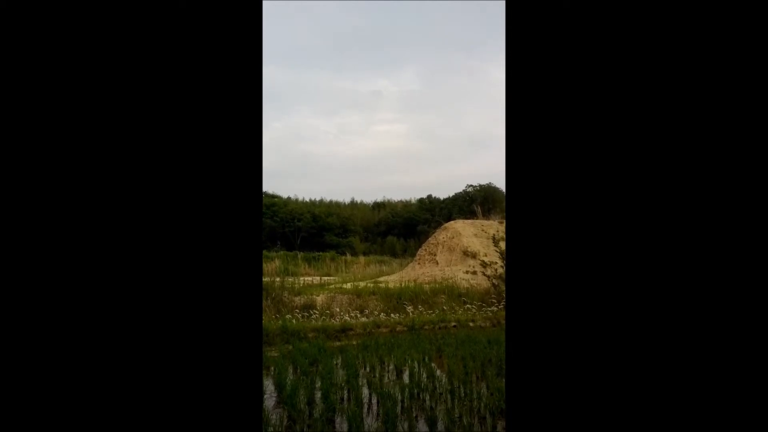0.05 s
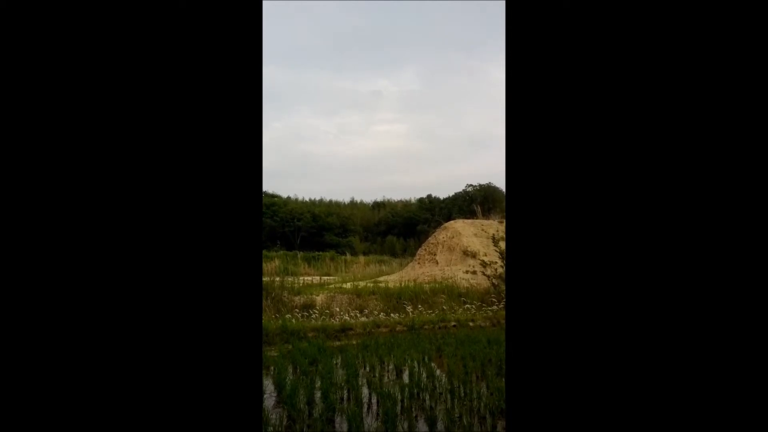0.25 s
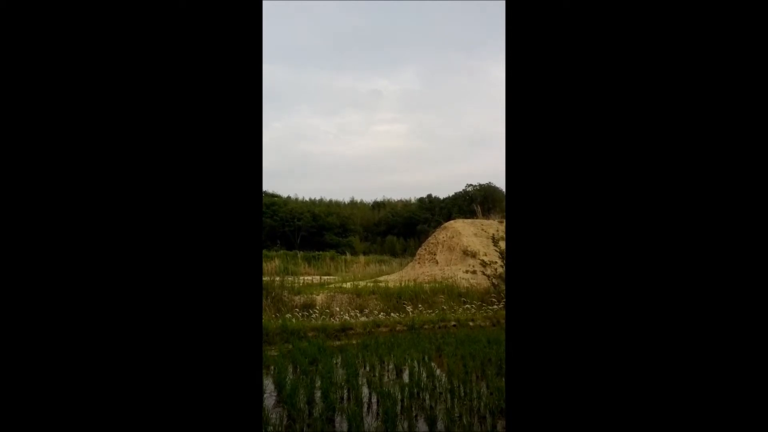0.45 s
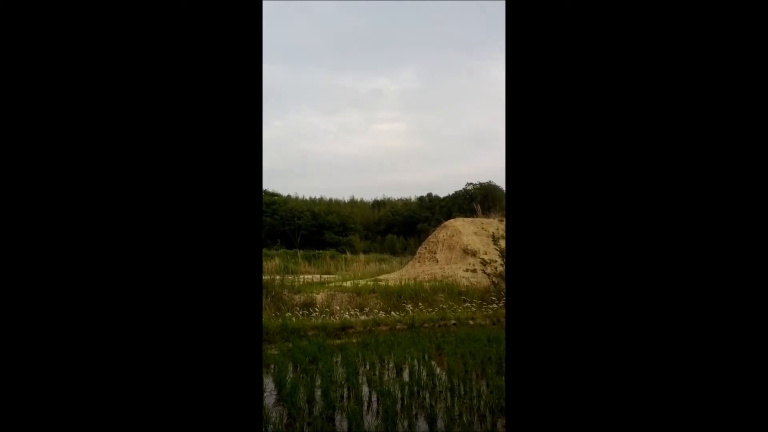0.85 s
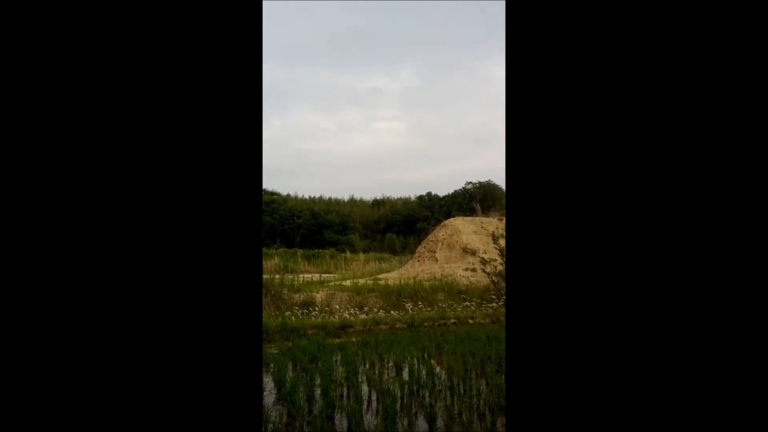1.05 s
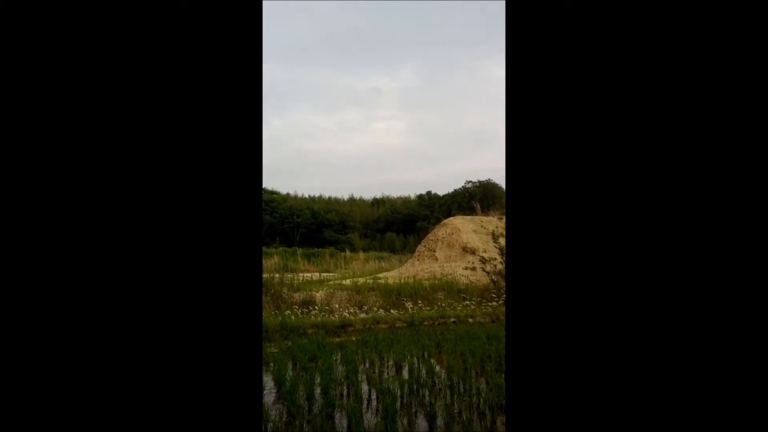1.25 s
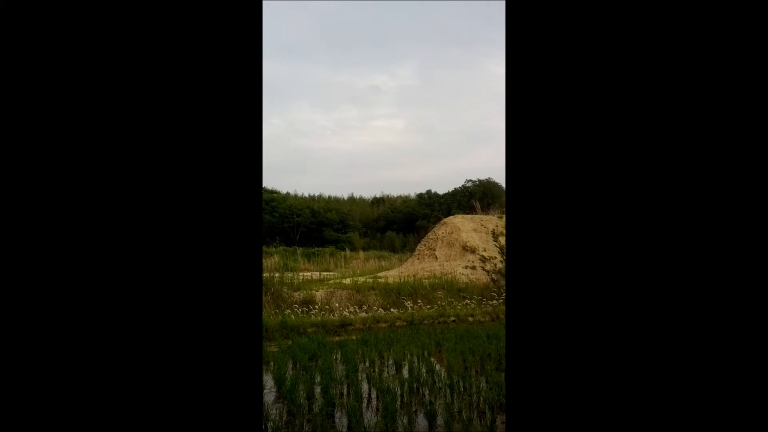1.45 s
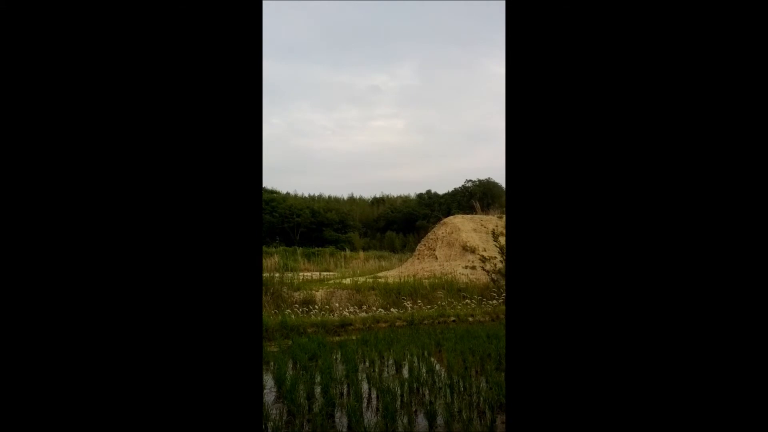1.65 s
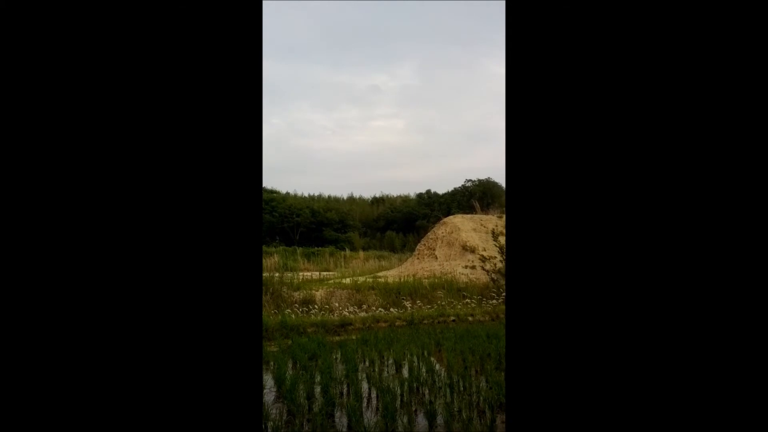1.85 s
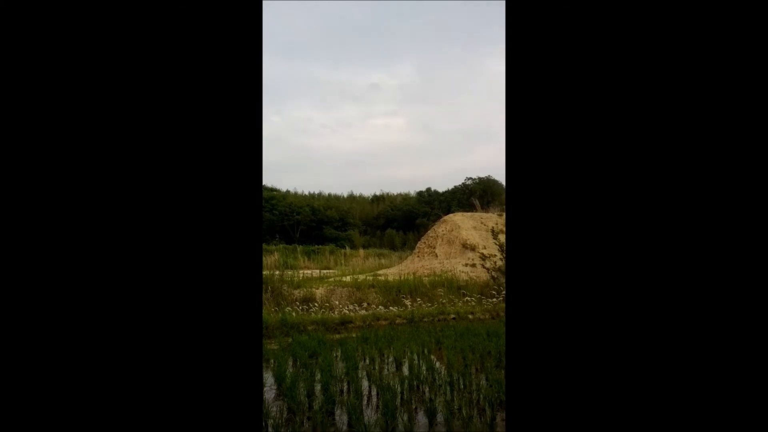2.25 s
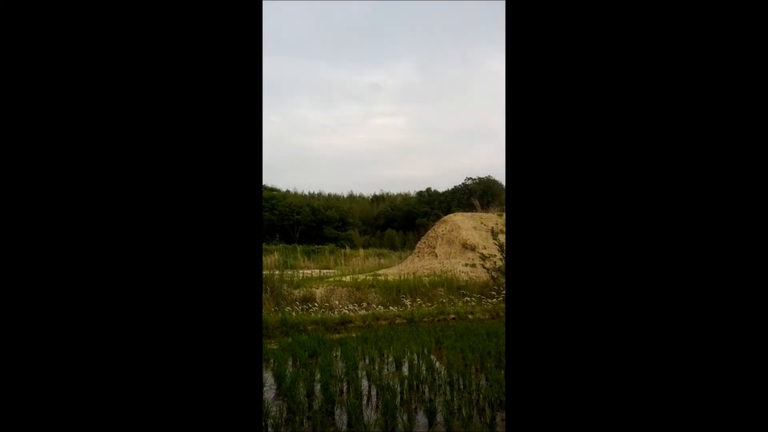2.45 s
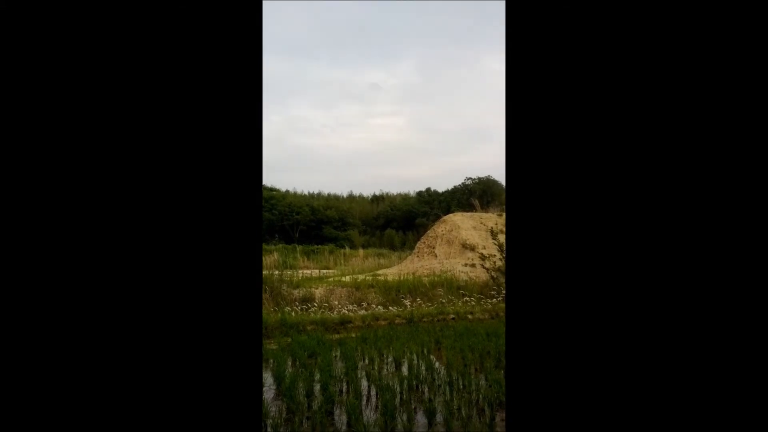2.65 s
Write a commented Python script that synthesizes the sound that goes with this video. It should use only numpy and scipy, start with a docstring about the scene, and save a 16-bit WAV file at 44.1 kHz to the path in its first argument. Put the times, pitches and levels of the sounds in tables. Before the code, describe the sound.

A bird calls in open countryside, three quick rising chirps followed by louder sliding whistles. Faint low hoots and thin, distant chirps sit behind it, and soft gusts rumble on the microphone throughout.

```python
"""Light wind puffs on the microphone as a far bird hoots four low notes and a songbird gives three
short rising ones, then a loud phrase of whistled slides. Small birds chirp and call across open fields.
Each note is a frequency-modulated tone, echoed faintly by the trees at the edge of a wood; the wind is
the fluctuating pressure of eddies. Behind lie a distant drone and a hiss whose treble dips four times."""
import sys
import numpy as np
from scipy import signal
from scipy.fft import rfft, irfft, next_fast_len
from scipy.io import wavfile
from scipy.ndimage import uniform_filter1d, map_coordinates

SR = 44100
rng = np.random.default_rng(int(sys.argv[2]) if len(sys.argv) > 2 else 0)


def master_out(mix):
    """Clip the mix to full scale and print it as 16-bit PCM to the path in sys.argv[1]."""
    frames = np.transpose(np.atleast_2d(mix))
    ceiling = np.clip(frames, -1, 1)
    pcm = np.round(ceiling * 32767).astype(np.int16)
    wavfile.write(sys.argv[1], SR, pcm)


N = 123479


def amp(db):
    """Decibels to amplitude ratio."""
    return 10 ** (np.asarray(db) / 20)


def unit(x):
    """Normalisation to rms 1."""
    return x / np.sqrt(np.mean(x ** 2) + 1e-20)


def clock():
    """Sample times in seconds."""
    return np.arange(N) / SR


def wobble(rate):
    """Random modulation: a spline through `rate` knots a second."""
    return map_coordinates(rng.standard_normal(4096), [clock() * rate], mode="wrap")


def filtered(x, response):
    """Linear filtering: the spectrum of x times a frequency response."""
    size = next_fast_len(N + SR // 2)
    return irfft(rfft(x, size) * response(np.fft.rfftfreq(size, 1 / SR)), size)[:N]


def noise(spectrum):
    """Spectral shaping of white noise: rms 1, nothing above the last point."""
    freqs, db = np.transpose(spectrum)

    def response(hz):
        return amp(np.interp(np.log(hz + 1), np.log(freqs + 1), db, right=-np.inf))
    return unit(filtered(rng.standard_normal(N), response))


def tone(hz):
    """A sinusoid of rms 1 whose phase is the integral of frequency."""
    return np.sqrt(2) * np.sin(2 * np.pi * np.cumsum(hz) / SR)


def gate(start, length, edge_s):
    """An amplitude envelope with quarter-sine attack and release."""
    t = clock() - start
    return np.sin(np.pi / 2 * np.clip(np.minimum(t, length - t) / edge_s, 0, 1))


# hiss spectrum: (frequency [Hz], relative density [dB])
HISS_SPECTRUM = [(130, -23), (220, 0.5), (283, -2.5), (338, -5), (370, -6.5), (501, -5.5), (599, -8.5),
                 (716, -6), (856, -9), (920, -9), (3100, -16), (8300, -17.5), (13500, -12.5), (15800, -16)]
# treble dips: (time [s], half width [s], gain [dB])
HISS_DIPS = [(1.086, .007, -15), (1.811, .007, -16), (2.262, .0075, -22), (2.472, .006, -18)]

def hiss(level_db=-62, crossover_hz=750):
    """Broadband air and microphone noise; Gaussian dips briefly attenuate its upper band."""
    dip_db = sum(db * np.exp(-np.square((clock() - s) / width)) for s, width, db in HISS_DIPS)
    air = noise(HISS_SPECTRUM)
    low = filtered(air, lambda hz: 1 / (1 + (hz / crossover_hz) ** 4))
    return amp(level_db) * (low + (air - low) * amp(dip_db))


# drone envelope: (time [s], level [dB])
DRONE_LEVELS = [(0, -61), (.9, -64.5), (1.2, -60), (1.42, -58), (1.62, -62), (2.2, -64.5), (2.8, -62.5)]
# drone spectrum: (frequency [Hz], relative density [dB])
DRONE_SPECTRUM = [(70, -44), (105, -11.5), (132, -2.5), (160, -9), (220, -23.5), (400, -56)]

def drone():
    """Narrow-band noise, heard as a distant wavering hum."""
    level_db = np.interp(clock(), *np.transpose(DRONE_LEVELS))
    return amp(level_db) * noise(DRONE_SPECTRUM)


def eddies(spectrum):
    """Turbulence of even strength: noise divided by its running rms."""
    pressure = noise(spectrum)
    power = np.abs(uniform_filter1d(pressure ** 2, size=2000))
    return pressure / np.sqrt(power + 1e-6)


# spectra of large and small eddies: (frequency [Hz], relative density [dB])
RUMBLE_SPECTRUM = [(12, -9), (25, 5.5), (50, 0.5), (62, -13.5), (100, -49)]
PUFF_SPECTRUM = [(40, -20), (58, 5), (85, -2.5), (120, -12), (180, -20.5), (280, -38), (600, -56)]
# gusts: (time [s], relative rumble level [dB], relative puff level [dB])
GUSTS = [(0.0, -58, -66), (0.14, -48.5, -54.5), (0.18, -54.5, -64), (0.23, -41, -47), (0.26, -46, -52),
         (0.29, -42.5, -41.5), (0.34, -41.5, -46), (0.4, -52.5, -54.5), (0.55, -59, -62), (0.581, -43, -49),
         (0.68, -55.5, -56.5), (0.74, -51, -49.5), (0.79, -52.5, -58), (0.861, -47.5, -41),
         (0.89, -39.5, -51.5), (1.01, -59.5, -62.5), (1.22, -49.5, -50.5), (1.27, -64, -44.5),
         (1.34, -64, -60), (1.56, -60.5, -60.5), (1.62, -45, -51), (1.74, -48, -40.5), (1.77, -41.5, -48),
         (1.83, -50, -55), (1.85, -45.5, -51), (1.93, -50.5, -63.5), (1.99, -57.5, -53), (2.12, -53.5, -72),
         (2.15, -56, -54), (2.22, -55, -63), (2.32, -47.5, -48.5), (2.45, -67, -60.5), (2.48, -49, -54),
         (2.58, -59.5, -61.5), (2.8, -61, -65)]

def wind(rumble_gain_db=0.5, puff_gain_db=1.5, breeze_db=-42, bright_hz=95, bright_db_per_db=0.17):
    """Turbulent pressure on the microphone: large eddies rumble, small ones puff, brighter if strong."""
    times, *levels = np.transpose(GUSTS)
    rumble_db, puff_db = [np.interp(clock(), times, db) for db in levels]
    puffs = eddies(PUFF_SPECTRUM)
    dull = filtered(puffs, lambda hz: 1 / (1 + (hz / bright_hz) ** 4))
    puffs = dull + (puffs - dull) * amp(bright_db_per_db * (puff_db - breeze_db))
    rumble = eddies(RUMBLE_SPECTRUM)
    return amp(rumble_db + rumble_gain_db) * rumble + amp(puff_db + puff_gain_db) * puffs


# eddy impacts: (time [s], frequency [Hz], envelope peak [dB])
BUFFETS = [(.283, 62, -30.5), (.331, 55, -34), (.744, 71, -34.5), (1.282, 75, -34), (1.616, 55, -34.5),
           (1.701, 81, -34), (2.305, 71, -34.5)]

def buffets(half_width_cycles=0.55, roundness=1.4):
    """A bipolar pressure pulse: one eddy pushes on the microphone, then snaps over into suction."""
    out = np.zeros(N)
    for time, hz, db in BUFFETS:
        cycles = hz * (clock() - time)
        envelope = np.exp(-np.abs(cycles / half_width_cycles) ** roundness)
        out -= amp(db) * np.sin(2 * np.pi * cycles) * envelope
    return out


# reflections from banks and trees: (delay [s], gain [dB])
ECHOES = [(0.026, -24), (.044, -22)]

def trees(x, tail_db=-18, t60_s=0.52, tail_delay_s=0.023):
    """Reflection and reverberation: two distinct echoes and a thin, exponentially decaying tail."""
    t = np.arange(SR) / SR
    build_up = np.clip(t / tail_delay_s - 1, 0, 1)
    tail = rng.standard_normal(SR) * amp(-60 * t / t60_s) * build_up
    echoes = filtered(x, lambda hz: sum(amp(db) * np.exp(-2j * np.pi * hz * s) for s, db in ECHOES))
    return echoes + amp(tail_db) * signal.fftconvolve(x, tail / np.linalg.norm(tail))[:N]


def leaves(x, share, t60_s=0.32):
    """Multipath scattering: foliage smears a share of the energy in time."""
    t = np.arange(SR // 5) / SR
    paths = rng.standard_normal(len(t)) * amp(-60 * t / t60_s)
    scattered = signal.fftconvolve(x, paths / np.linalg.norm(paths))[:N]
    return np.sqrt(1 - share) * x + np.sqrt(share) * scattered


WARBLE_PER_S = 420
# far chirps: (start [s], duration [s], frequency [Hz], warble depth [Hz], initial level [dB])
CHIRPS = [(0.351, 0.036, 4950, 402, -69), (1.595, .04, 4740, 360, -67.5), (2.62, 0.024, 4480, 55, -70),
          (2.644, 0.025, 3780, 40, -72), (2.737, 0.03, 5160, 300, -70.5)]

def chirps(swell_db=2.5):
    """Rapid random frequency modulation makes far chirps rasp; each swells slightly as it goes."""
    out = np.zeros(N)
    for start, length, hz, depth, db in CHIRPS:
        progress = np.clip((clock() - start) / length, 0, 1)
        envelope = amp(db + swell_db * progress) * gate(start, length, edge_s=0.0029)
        out += envelope * tone(hz + depth * wobble(WARBLE_PER_S))
    return leaves(out, share=0.35)


# high calls: (start [s], duration [s], first frequency [Hz], last frequency [Hz], level [dB])
THIN_CALLS = [(0.901, 0.038, 8520, 8020, -64), (1.075, 0.054, 8400, 8010, -65)]

def thin_calls(glide_share=0.72, warble_hz=25, echo_s=0.042, echo_db=-10.5):
    """High tones glide down and settle; reflection from the wood adds a delayed copy."""
    calls = np.zeros(N)
    for start, length, first, last, db in THIN_CALLS:
        progress = np.clip((clock() - start) / (glide_share * length), 0, 1)
        glide = np.sin(np.pi / 2 * progress) ** 2
        pitch = first + (last - first) * glide + warble_hz * wobble(WARBLE_PER_S)
        calls += amp(db) * gate(start, length, edge_s=0.018) * tone(pitch)
    echoed = filtered(calls, lambda hz: 1 + amp(echo_db) * np.exp(-2j * np.pi * hz * echo_s))
    return leaves(echoed, share=0.2)


# low hoots: (start [s], duration [s], first frequency before sag [Hz], held frequency [Hz], level [dB])
HOOTS = [(-.005, 0.067, 1008, 864, -66.5), (.114, 0.095, 912, 875, -66.5), (.260, 0.099, 926, 873, -65),
         (.383, 0.099, 996, 857, -65)]

def hoots(settle_s=0.0158, sag_hz_per_s=139):
    """Exponential relaxation: each far hoot drops onto its pitch, which also sags linearly."""
    out = np.zeros(N)
    for start, length, first, held, db in HOOTS:
        t = np.clip(clock() - start, 0, length)
        pitch = held + (first - held) * np.exp(-t / settle_s) - sag_hz_per_s * (t - length / 2)
        out += amp(db) * gate(start, length, edge_s=0.015) * tone(pitch)
    return out


def whistle(times, hz, db, flutter_db=0.0, jitter=0.0045):
    """Frequency and amplitude modulation: one note follows its contours, with random deviations."""
    contour = uniform_filter1d(np.interp(clock(), times, hz), size=130)
    pitch = contour * (1 + jitter * wobble(400))
    level_db = np.interp(clock(), times, db) + flutter_db * wobble(300.1)
    return tone(pitch) * amp(level_db) * gate(times[0], times[-1] - times[0], edge_s=0.0016)


# rising notes: (start [s], top frequency [Hz], reference level [dB])
RISES = [(0.079, 3453, -57.5), (0.231, 3507, -56), (0.4, 3550, -54.5)]
# their shared contour: (time after start [s], frequency / top [ratio], relative level [dB])
RISE_CONTOUR = [(0, .51, -17), (.008, .61, -8.5), (.014, .74, -4), (.019, .91, -12), (.024, .975, -1),
                (.029, .995, 1), (.035, .985, -1.5), (.041, .955, -12), (.046, .92, -12)]

def songbird_rises():
    """Jitter and shimmer make three rising notes slightly hoarse; foliage scatters them."""
    after, ratio, contour_db = np.transpose(RISE_CONTOUR)
    notes = sum(whistle(start + after, hz * ratio, db + contour_db, flutter_db=2, jitter=0.022)
                for start, hz, db in RISES)
    return leaves(notes, share=0.3, t60_s=0.13)


# whistled phrase, one contour per slide: (time [s], frequency [Hz], level [dB])
SLIDES = [
    [(.511, 1747, -63), (.515, 1570, -55), (.522, 1416, -51.5), (.531, 1490, -47), (.540, 1604, -45),
     (.550, 1813, -41), (.558, 1865, -41.5), (.565, 1810, -43.5), (.573, 1680, -61)],
    [(.623, 3063, -69), (.629, 2550, -53), (.633, 2280, -41.5), (.640, 2050, -44), (.644, 2140, -46),
     (.648, 2560, -61)],
    [(.651, 2840, -66), (.660, 2300, -55), (.6635, 1914, -48), (.670, 1730, -47), (.691, 1477, -48),
     (.700, 1290, -58), (.711, 1198, -61), (.720, 1120, -81)],
]

def songbird_slides():
    """Frequency sweeps of a nearly pure tone form the loud phrase."""
    return sum(whistle(*np.transpose(slide)) for slide in SLIDES)


def scene():
    """Superposition of the birds and their echoes on wind, drone and hiss."""
    birds = songbird_rises() + songbird_slides() + hoots() + thin_calls() + chirps()
    return (birds + trees(birds) + wind() + buffets() + drone() + hiss())[None]


def record(dry):
    """Band limiting: an ideal low-pass filter."""
    cutoff_hz = 15800
    return filtered(dry[0], lambda hz: hz < cutoff_hz)[None]


dry = scene()
out = record(dry)
master_out(out)
```